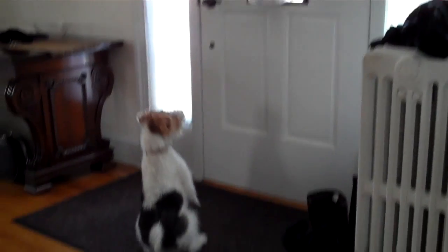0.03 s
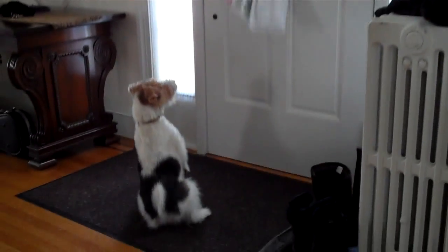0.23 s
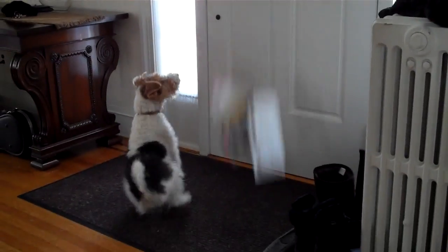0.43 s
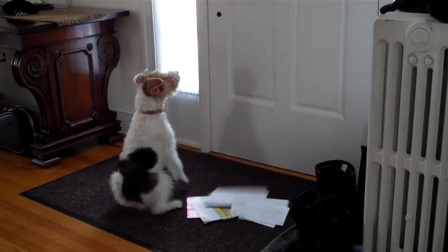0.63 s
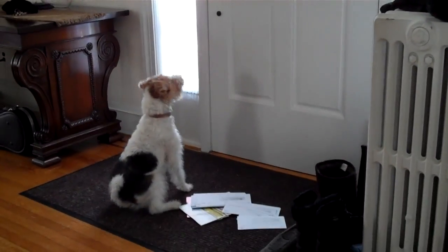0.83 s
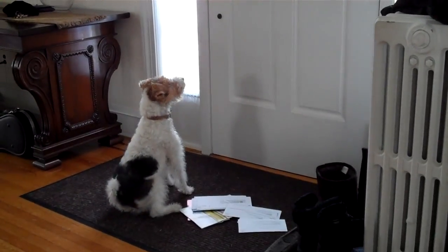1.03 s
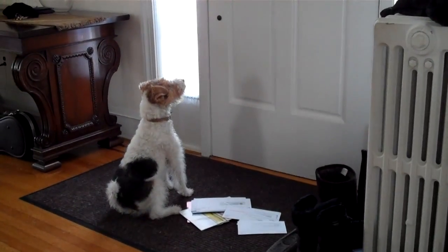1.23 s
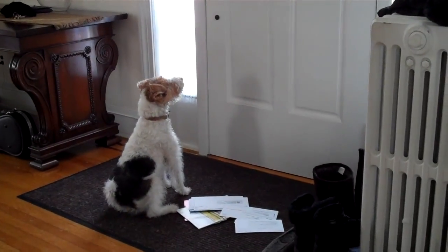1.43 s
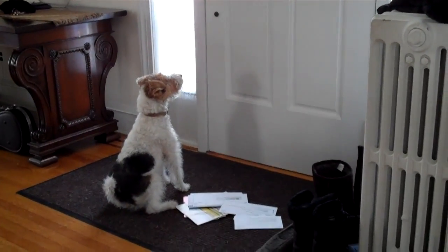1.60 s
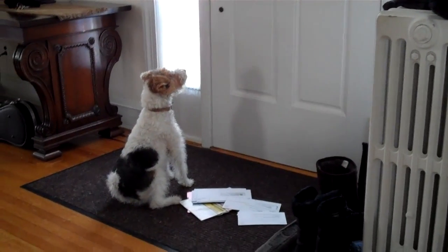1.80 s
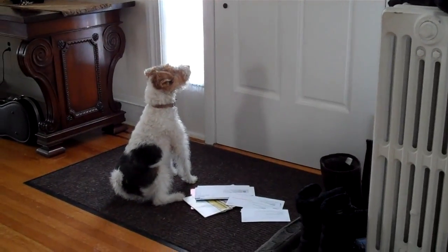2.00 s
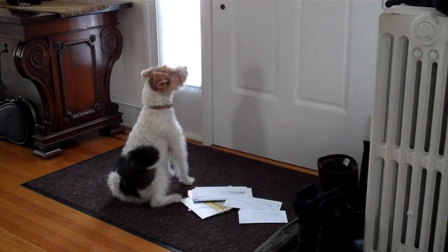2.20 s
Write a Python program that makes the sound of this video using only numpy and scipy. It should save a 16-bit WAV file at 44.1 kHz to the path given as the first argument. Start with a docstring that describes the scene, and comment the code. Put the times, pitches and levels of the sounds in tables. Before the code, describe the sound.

A metal mail slot opens the sound, with letters scraping through, soft door bumps and small hinge squeaks. At about 0.2 seconds the flap clacks shut and rings briefly while paper edges tick against it. From 0.5 to 0.7 seconds the letters slap onto a doormat in quick succession and settle. The small hallway echoes briefly, and from about one second only faint hiss and rumble remain.

```python
"""A small hallway, at the front door. Letters scrape through a metal slot: the door panel bumps,
the hinge squeaks, paper edges tick on the metal, and the flap clacks shut and rings.
The letters slap onto the doormat one after another and settle. The hallway answers briefly,
then only faint hiss and rumble remain."""
import sys
import numpy as np
from scipy import signal
from scipy.fft import rfft, irfft, next_fast_len
from scipy.io import wavfile
from scipy.ndimage import map_coordinates

SR = 44100
rng = np.random.default_rng(int(sys.argv[2]) if len(sys.argv) > 2 else 0)


def persist_wave(psi):
    """Save psi, clipped to +-1, as 16-bit WAV."""
    counts = np.round(np.clip(psi, -1, 1) * 32767).astype(np.int16)
    wavfile.write(sys.argv[1], SR, np.atleast_2d(counts).T)


N = 103635

# Noise spectra. Each row: frequency in Hz, relative level in dB.
HISS_SPECTRUM = [(12, -35.5), (20, -3.5), (22, -8.5), (48, -10), (65, -14.5), (122, -11), (236, -15.5),
                 (263, -15), (365, -14), (980, -16), (1090, -13), (1330, -19), (4550, -21), (10400, -35.5),
                 (14000, -53)]
RUMBLE_SPECTRUM = [(5, 15), (30, -9.5), (60, -24.5), (200, -46.5), (1000, -100)]
SCRAPE_SPECTRUM = [(35, -40), (60, -17), (290, -17), (465, -13.5), (780, -5.5), (835, -2.5), (1020, -11.5),
                   (2350, -4.5), (3150, -13), (13000, -23.5)]
DOOR_SPECTRUM = [(20, -16), (60, 1.5), (150, -4), (220, -9.5), (400, -40), (1000, -70)]
EDGE_SPECTRUM = [(100, -24.5), (1000, 10.5), (3500, 5.5), (6500, 4), (10500, -6), (14000, -16)]
CLACK_SPECTRUM = [(40, -50), (140, -29), (230, -20), (320, -7.5), (430, -14.5), (560, -16), (700, -7),
                  (960, -15.5), (1300, -12.5), (1900, -5), (2800, -6), (4000, -9.5), (9300, -11.5),
                  (14000, -26.5)]
SLAP_SPECTRUM = [(60, -56.5), (300, -10), (470, -20), (750, -5.5), (1500, -3.5), (2600, 0), (4000, -0.5),
                 (6000, -7), (7500, -16.5), (10500, -17), (14000, -43)]
THUD_SPECTRUM = [(30, -20), (80, -11), (170, -8.5), (310, -1), (440, -11), (660, 4), (1000, -4),
                 (2500, -32.5)]
RUSTLE_SPECTRUM = [(40, -34), (100, -20.5), (190, -10.5), (330, -14), (450, -12.5), (750, -1.5), (1400, 0),
                   (2600, 4), (4000, -16), (10900, -25), (14000, -42.5)]

# Friction envelopes: paper in the slot, on the flap, on the mat. Each row: time in seconds, level in dB.
SCRAPE_ENVELOPE = [(0, -58.5), (.026, -54.5), (.036, -44.5), (.065, -52.5), (.09, -58), (.12, -56),
                   (.133, -46.5), (.19, -63), (.22, -46.5), (.27, -45.5), (.315, -61), (.335, -58),
                   (.375, -46), (.39, -90.5), (.44, -67), (.5, -50.5), (.53, -87)]
FLAP_RUB_ENVELOPE = [(.02, -80), (.04, -58), (.14, -78), (.22, -66), (.255, -33), (.3, -37), (.335, -46.5),
                     (.39, -55), (.46, -64), (.55, -120)]
SETTLE_ENVELOPE = [(.528, -105), (.54, -38.5), (.575, -38), (.6, -34), (.625, -40.5), (.65, -37),
                   (.675, -49), (.72, -85), (.8, -91)]

# Blows. Each row: start in seconds, relative level in dB.
DOOR_BUMPS = [(.002, -47), (.024, -68), (0.047, -59), (.115, -64), (.232, -54), (0.275, -45)]
EDGE_TICKS = [(0.0475, -41.5), (0.1686, -37), (0.3097, -25.5), (0.37, -38.5), (0.455, -35.5), (0.462, -53),
              (0.489, -56)]
FLAP_CLACKS = [(0.2250, -18.5), (0.2282, -18), (0.2346, -22.5), (0.313, -35.5)]

# Hinge squeaks. Each row: start in seconds, length in seconds, pitch in Hz, level in dB.
HINGE_SQUEAKS = [(.008, 0.032, 2660, -47.5), (0.133, 0.081, 2365, -54.5), (0.289, .028, 2350, -37.5),
                 (0.337, 0.07, 2355, -45), (0.46, 0.018, 2310, -42.5), (0.478, .025, 2305, -49.5)]
# Flap resonances. Each row: frequency in Hz, relative level in dB, T60 in seconds.
FLAP_MODES = [(833.5, -9, .3), (1304, -4, .14), (1788, 1, .1), (1948, -1, .11), (3616, -2, .1),
              (4974, -10, .28), (5699, -12, .42), (5840, -14, .36), (6355, -6, .27), (6899, -11, .28),
              (7237, -7, .2), (9308, -13, .24), (9600, -15, .28), (10763, -6, .15), (12400, -19, .25)]
# A paper edge slowing. Each row: time in seconds, pitch in Hz, level in dB.
ZIP_GLIDE = [(.285, 1800, -65.5), (.3, 1570, -55), (.32, 1280, -60), (.343, 1120, -52), (.355, 1050, -72)]
# Letters on the mat. Each row: start in seconds, slap, thud and edge levels in dB,
# T60 of slap and edge in seconds.
LANDINGS = [(.5312, -20, -29, -22, 0.029), (0.5372, -24, -35, -27, 0.025), (.5625, -27.5, -41, -39.5, .06),
            (0.576, -31, -46.5, -38.5, .04), (0.588, -32, -48.5, -41.5, .025),
            (0.6097, -21, -38, -42, .012), (0.6347, -27.5, -51, -36, 0.024),
            (0.6418, -20.5, -47, -36.5, 0.023), (.651, -33.5, -47.5, -34.5, 0.022)]
# Hallway decay. Each row: frequency in Hz, T60 in seconds.
HALL_DECAY = [(70, 0.93), (200, .42), (400, 0.44), (1000, 0.39), (3000, 0.3), (7000, .28), (13000, .26)]
# Stereo width of the tail. Each row: frequency in Hz, side over mid in dB.
HALL_WIDTH = [(60, -18), (300, -16.5), (1000, -13), (2000, -5.5), (4000, 0.5), (12000, 0.5)]
# Stereo balance. Each row: frequency in Hz, left over right in dB.
BALANCE = [(100, -3.5), (500, -3), (1000, -3), (4000, -3), (8000, -5.5), (13000, -6)]


def amp(db):
    """Decibels to gain."""
    return 10 ** (np.asarray(db) / 20)


def unit(x):
    """Scale to rms 1."""
    return x / np.sqrt(np.mean(x ** 2) + 1e-20)


def along(points, hz):
    """Interpolate (Hz, value) points on a log axis."""
    f, v = np.transpose(points)
    return np.interp(np.log(hz + 1), np.log(f + 1), v)


def curves(rows):
    """One value per sample for each column after the time."""
    times_s, *columns = np.transpose(rows)
    return [np.interp(np.arange(N) / SR, times_s, column) for column in columns]


def since(start_s):
    """Seconds since a moment, zero before it."""
    return np.maximum(np.arange(N) / SR - start_s, 0)


def wobble(knots_per_s):
    """Smooth random curve."""
    return map_coordinates(rng.standard_normal(N // 20), [np.arange(N) * knots_per_s / SR], mode="wrap")


def filtered(x, response):
    """Apply a gain given as a function of Hz."""
    size = next_fast_len(N + SR // 2)
    return irfft(rfft(x, size) * response(np.fft.rfftfreq(size, 1 / SR)), size)[..., :N]


def coloured(x, spectrum):
    """Shape x by a spectrum, to rms 1."""
    return unit(filtered(x, lambda hz: amp(along(spectrum, hz))))


def noise(spectrum):
    """Coloured noise, rms 1."""
    return coloured(rng.standard_normal(N), spectrum)


def blow(start_s, t60_s, rise_s):
    """Impact envelope: quick rise, exponential decay."""
    t = since(start_s)
    return (1 - np.exp(-t / rise_s)) * np.exp(-np.log(1000) * t / t60_s)


def burst(envelope, spectrum):
    """Noise puff through a minimum-phase filter of unit power."""
    size = 2 * next_fast_len(N)
    gain = amp(along(spectrum, np.fft.rfftfreq(size, 1 / SR)))
    cepstrum = irfft(np.log(unit(gain)), size)
    cepstrum[1:size // 2] *= 2
    cepstrum[size // 2 + 1:] = 0
    puff = envelope * rng.standard_normal(N)
    return irfft(rfft(puff, size) * np.exp(rfft(cepstrum)), size)[:N]


def background(hiss_db=-68, rumble_db=-67):
    """Steady hiss, independent per channel, over a low rumble."""
    hiss = np.array([noise(HISS_SPECTRUM), noise(HISS_SPECTRUM)])
    return amp(hiss_db) * hiss + amp(rumble_db) * noise(RUMBLE_SPECTRUM)


def paper_friction(envelope, spectrum, grains_per_s, spread_db=4.5):
    """Sliding paper: dense friction grains of uneven size."""
    level_db, = curves(envelope)
    grains = (rng.random(N) < grains_per_s / SR) * rng.standard_normal(N)
    grains *= amp(spread_db * rng.standard_normal(N))
    return amp(level_db) * coloured(grains, spectrum)


def hallway(x, direct_db=0.5, wet_db=-2, rise_s=0.0023):
    """Direct sound plus a short stereo tail, wider in the treble."""
    hz, t, bins = signal.stft(rng.standard_normal((2, SR // 2)), SR, nperseg=256)
    decay = amp(-60 * t / along(HALL_DECAY, hz)[:, None])
    tail = signal.istft(bins * decay, SR, nperseg=256)[1]
    tail *= 1 - np.exp(-np.arange(tail.shape[1]) / SR / rise_s)
    mid, side = signal.fftconvolve(x[None], tail / np.linalg.norm(tail[0]), axes=1)[:, :N]
    side = filtered(side, lambda hz: amp(along(HALL_WIDTH, hz)))
    return amp(direct_db) * x + amp(wet_db) * np.array([mid + side, mid - side])


def door_bumps():
    """The panel bumps dully as the bundle is forced through."""
    envelope = sum(amp(db) * blow(start_s, t60_s=.078, rise_s=.003) for start_s, db in DOOR_BUMPS)
    return envelope * noise(DOOR_SPECTRUM)


def hinge_squeaks(waver_hz=18, rough_db=2, overtone_db=-15.5):
    """Short, rough squeaks as the flap turns."""
    out = np.zeros(N)
    for start_s, length_s, hz, db in HINGE_SQUEAKS:
        progress = np.minimum(since(start_s) / length_s, 1)
        swell = np.abs(np.sin(np.pi * progress)) ** .5
        phase = 2 * np.pi * np.cumsum(hz + waver_hz * wobble(250)) / SR
        tone = unit(np.sin(phase) + amp(overtone_db) * np.sin(2 * phase))
        out += amp(db + rough_db * wobble(300)) * swell * tone
    return out


def flap_ring(gain_db=-27, flicker_db=1.3, waver_rad=.15, stereo_rad=.54):
    """Rubbing paper drives the flap's lowest mode; the first clack sets all modes ringing unsteadily."""
    out = np.zeros((2, N))
    shut_s = FLAP_CLACKS[0][0]
    rub_db, = curves(FLAP_RUB_ENVELOPE)
    for k, (hz, db, t60_s) in enumerate(FLAP_MODES):
        shape = blow(shut_s, t60_s, rise_s=.002)
        level = amp(db + gain_db) * shape / shape.max()
        if k == 0:
            level = np.hypot(level, np.sqrt(2) * amp(rub_db))
        offset_rad = stereo_rad * hz / (hz + 2000) * rng.choice([-1, 1])
        phase = 2 * np.pi * (hz * since(shut_s) + rng.random()) + waver_rad * wobble(64)
        out += level * amp(flicker_db * wobble(50)) * np.sin([phase + offset_rad, phase - offset_rad])
    return out


def edge_ticks():
    """Paper edges tap the metal."""
    envelope = sum(amp(db) * blow(start_s, t60_s=.036, rise_s=.0011) for start_s, db in EDGE_TICKS)
    return burst(envelope, EDGE_SPECTRUM)


def flap_clacks(gain_db=2):
    """The flap chatters against its frame."""
    envelope = sum(amp(db) * blow(start_s, t60_s=.026, rise_s=.0005) for start_s, db in FLAP_CLACKS)
    return amp(gain_db) * burst(envelope, CLACK_SPECTRUM)


def edge_zip(pitch_jitter=.033):
    """A letter's edge zips out, falling in pitch as it slows."""
    hz, level_db = curves(ZIP_GLIDE)
    gate = level_db > ZIP_GLIDE[0][2]
    phase = 2 * np.pi * np.cumsum(hz * (1 + pitch_jitter * wobble(700))) / SR
    return amp(level_db) * gate * np.sin(phase)


def letters_landing():
    """Each letter slaps down with a crisp edge and a soft thud from the mat, then skids to rest."""
    slaps, thuds, edges = np.zeros((3, N))
    for start_s, slap_db, thud_db, edge_db, t60_s in LANDINGS:
        contact = blow(start_s, t60_s, rise_s=.00077)
        slaps += amp(slap_db) * contact
        edges += amp(edge_db) * contact
        thuds += amp(thud_db) * blow(start_s, t60_s=.039, rise_s=.000977)
    paper = hallway(burst(slaps, SLAP_SPECTRUM) + burst(edges, EDGE_SPECTRUM))
    mat = hallway(burst(thuds, THUD_SPECTRUM))
    skid = hallway(paper_friction(SETTLE_ENVELOPE, RUSTLE_SPECTRUM, grains_per_s=4800))
    return paper + mat + skid


def scene():
    """Slot and letters slightly to the right, over the background."""
    slot = edge_ticks() + edge_zip()
    slot += paper_friction(SCRAPE_ENVELOPE, SCRAPE_SPECTRUM, grains_per_s=17000)
    mail = hallway(slot) + hinge_squeaks() + hallway(flap_clacks()) + flap_ring()
    mail += door_bumps() + letters_landing()
    panned = filtered(mail, lambda hz: amp(along(BALANCE, hz) * np.array([[.5], [-.5]])))
    return panned + background()


def record(dry, peak_limit=.42, cutoff_hz=14200):
    """Soft peak limiter, then a brick-wall low-pass."""
    rounded = dry / (1 + np.abs(dry / peak_limit) ** 4) ** (1 / 4)
    return filtered(rounded, lambda hz: hz < cutoff_hz)


dry = scene()
out = record(dry)
persist_wave(out)
```